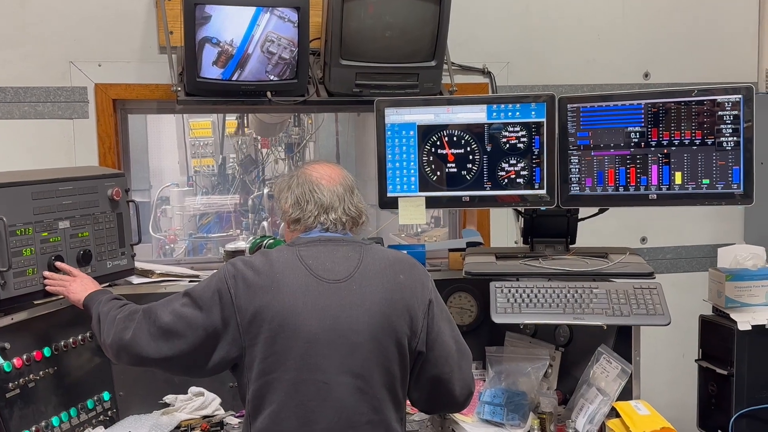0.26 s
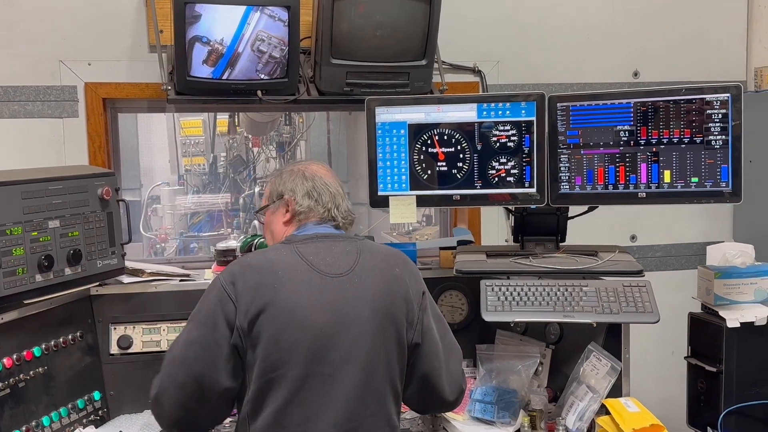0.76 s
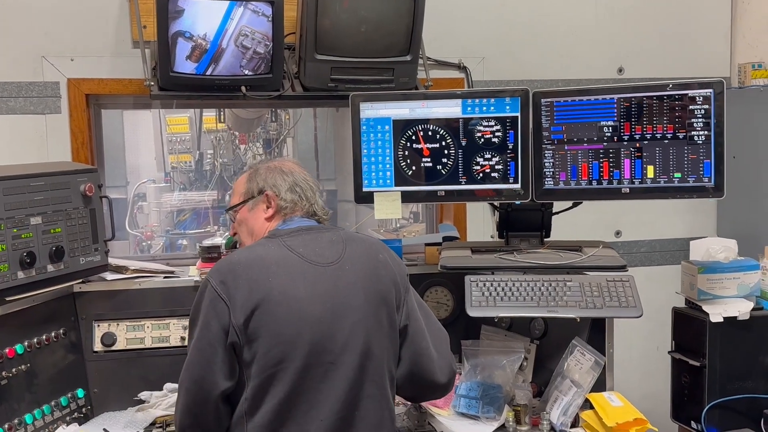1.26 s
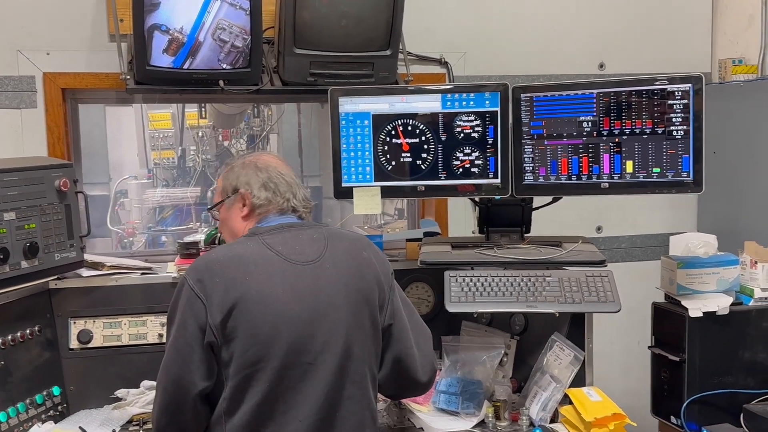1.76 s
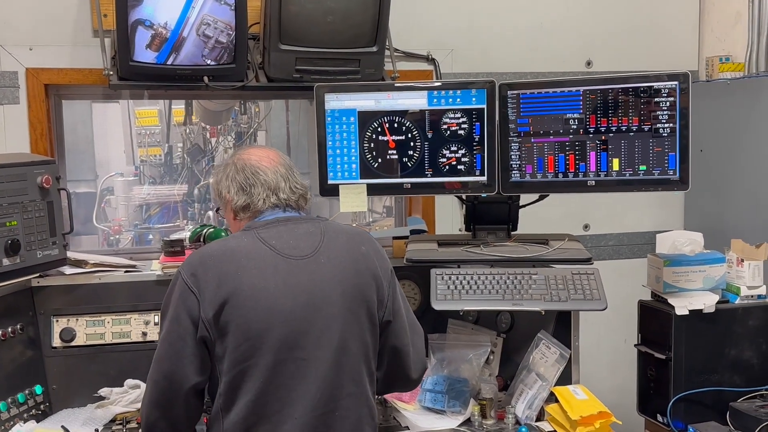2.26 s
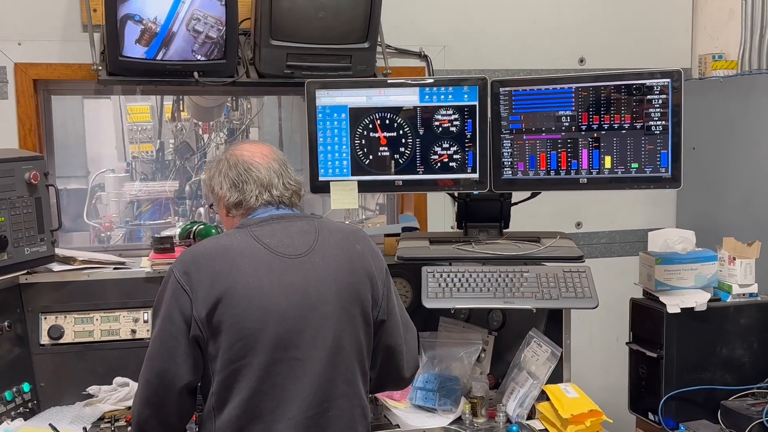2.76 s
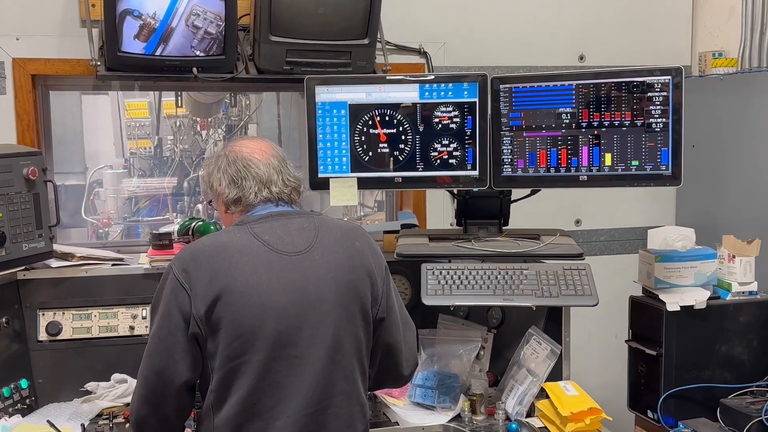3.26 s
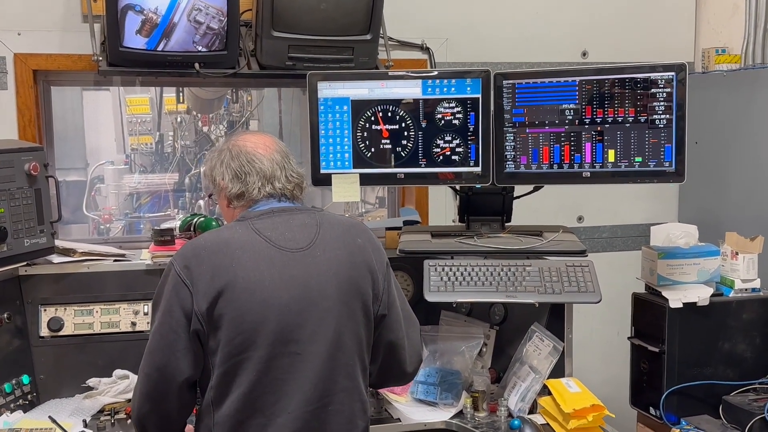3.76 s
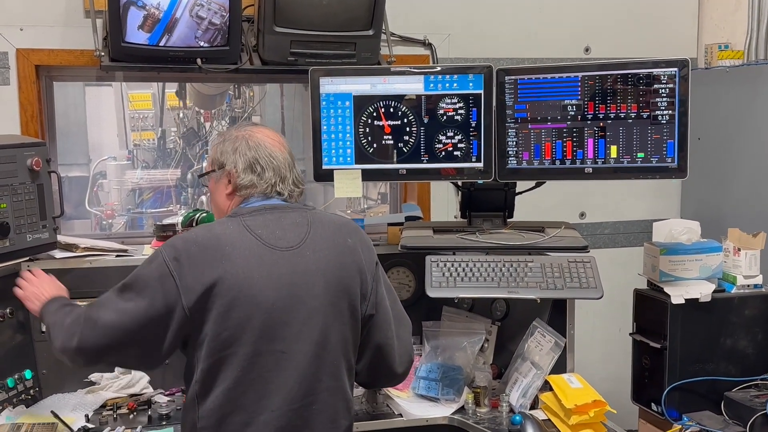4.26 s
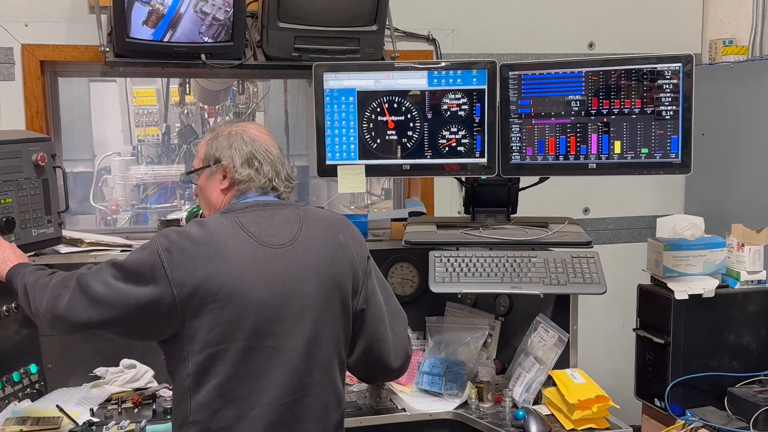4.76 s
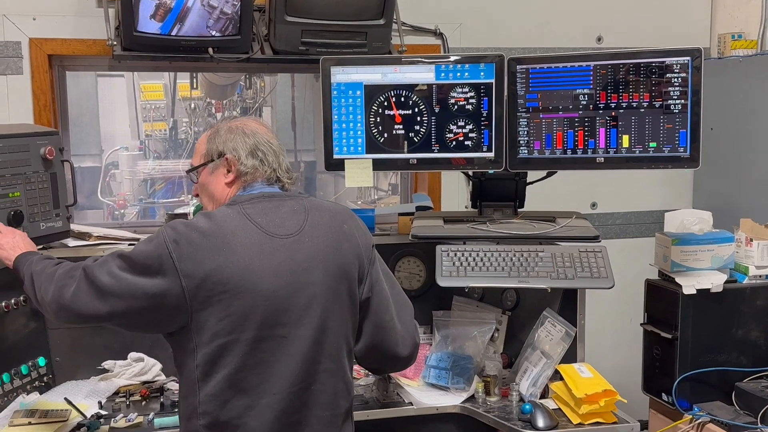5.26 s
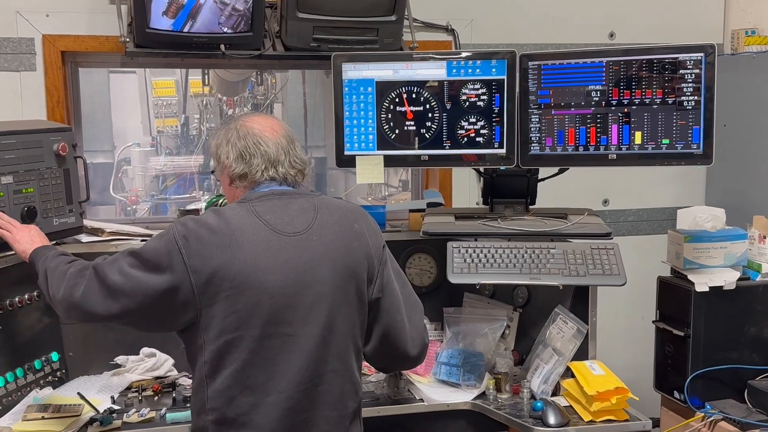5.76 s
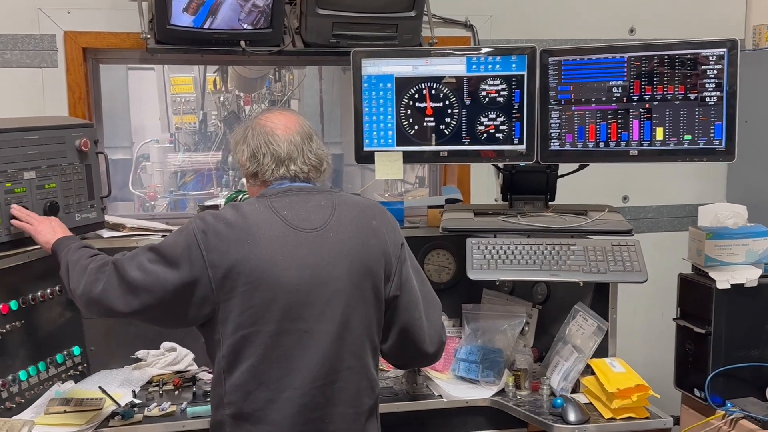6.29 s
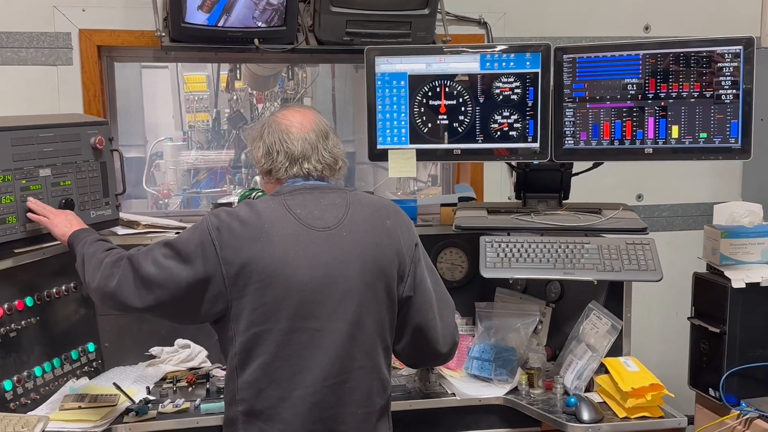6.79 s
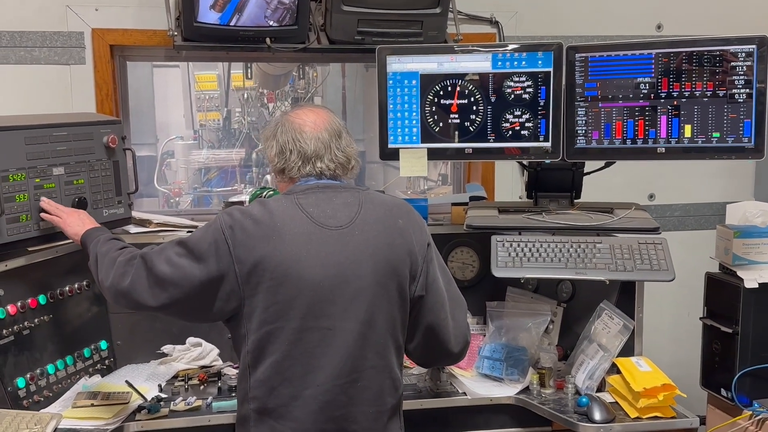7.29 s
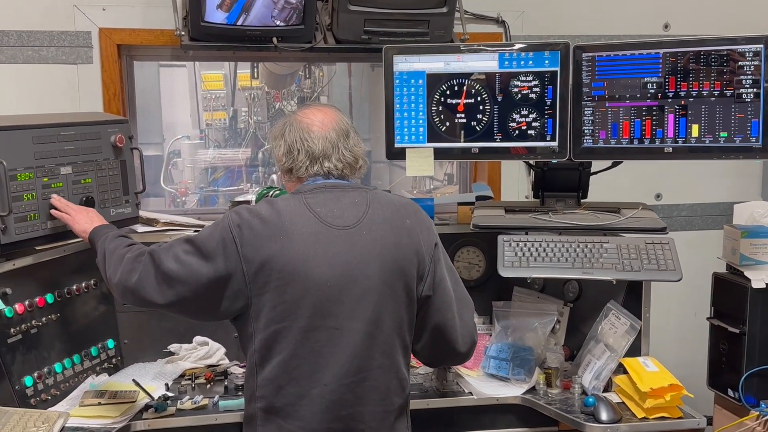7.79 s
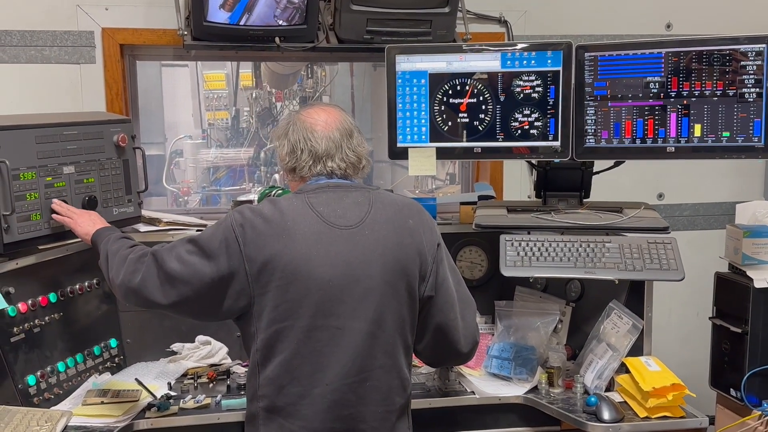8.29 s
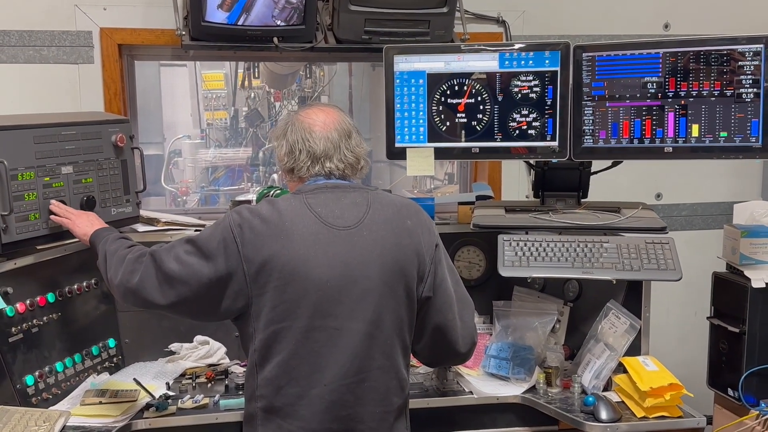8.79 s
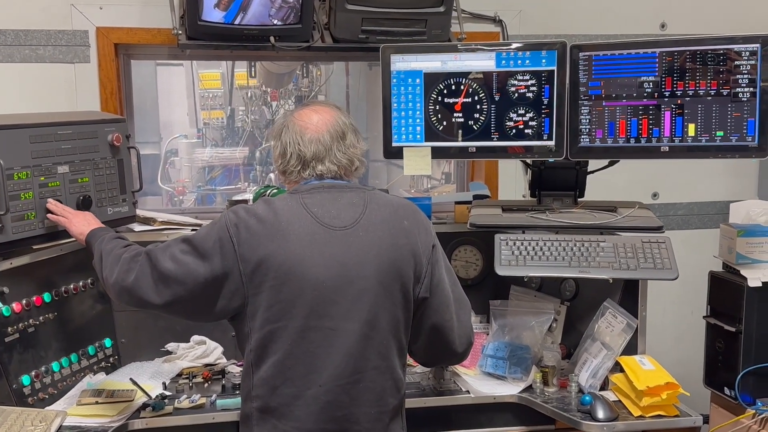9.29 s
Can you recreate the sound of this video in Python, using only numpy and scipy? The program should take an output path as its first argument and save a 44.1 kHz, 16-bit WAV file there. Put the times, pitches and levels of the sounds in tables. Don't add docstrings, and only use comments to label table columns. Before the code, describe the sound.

In a control room, a four-cylinder engine runs behind the test-cell window, a muffled low drone wavering slightly under steady ventilation roar and fan hum. A small hard object clinks once near two seconds. After five seconds the throttle opens, the pitch climbs by about a third with swelling tones, clatter and air hiss, then holds high. Stereo pickup from one small device in the room.

```python
import sys
import numpy as np
from scipy import signal
from scipy.fft import rfft, irfft, next_fast_len
from scipy.io import wavfile

SR = 44100
rng = np.random.default_rng(int(sys.argv[2]) if len(sys.argv) > 2 else 0)


def wav_record(signal):
    frames = np.transpose(np.atleast_2d(signal))
    bounded = np.clip(frames, -1, 1)
    quanta = np.round(bounded * 32767).astype(np.int16)
    wavfile.write(sys.argv[1], SR, quanta)


def volts_from_decibels(level):
    exponent = np.asarray(level, float) / 20
    return 10 ** exponent


N = 420707
SIZE = next_fast_len(N)
HZ = np.maximum(np.arange(SIZE // 2 + 1) * SR / SIZE, 1)

# f/Hz, likeness (clipped to 0-1)
LIKENESS = [(90, .999), (140, 1.3), (250, .84), (400, 0.8), (700, 0.32), (1000, .5), (1500, .58),
            (2100, 0.96), (4200, 1), (6000, .985), (8200, 1.5), (9700, 1.3), (11800, 1.2), (14500, 1)]


def rms_one(x):
    return x / np.sqrt(np.mean(x ** 2) + 1e-20)


def along(rows, at):
    first, *columns = np.transpose(rows)
    return [np.interp(at, first, column) for column in columns]


def at_hz(points, hz):
    point_hz, value = np.array(points).T[:2]
    return np.interp(np.log(hz), np.log(point_hz), value)


def drift(rate_hz):
    r = np.exp(-2 * np.pi * rate_hz * 40 / SR)
    white = rng.standard_normal(N // 40 + 2002)
    slow = signal.lfilter([1], [1, -2 * r, r * r], white)[2000:]
    return np.interp(np.arange(N) / 40, np.arange(len(slow)), rms_one(slow - slow.mean()))


def coloured(gain, alike):
    one, other = rfft(rng.standard_normal((2, SIZE))) * np.sqrt(SR / 2) * gain
    alike = np.clip(alike, 0, 1)
    second = alike * one + np.sqrt(1 - alike ** 2) * other
    return irfft([one, second], SIZE)[:, :N]


def ports(x):
    # f/Hz, lead of the left port/rad
    lead = [(0, -0.09), (860, 0.82), (1720, -0.17), (3360, 0.68), (4900, 0.45), (6400, 0.07), (7240, 1.2),
            (7850, 2.7), (8200, 3.05), (8680, 2.8), (9300, 1.33), (11300, -0.1), (13300, 0), (14200, -1.1),
            (15100, -1.7), (15600, -2.2)]
    # f/Hz, left minus right level/dB
    tilt = [(60, .6), (250, 1.1), (860, 1.0), (1550, 2.3), (2200, .4), (6000, .01)]
    half = volts_from_decibels(at_hz(tilt, HZ) / 2) * np.exp(.5j * along(lead, HZ)[0])
    return irfft(rfft(x, SIZE) * [half, 1 / half], SIZE)[:, :N]


def standing_waves(modes, hz):
    coarse = hz[::64]
    total = 0
    for centre_hz, half_width_hz, level_db, polarity in modes:
        total = total + np.sign(polarity) * volts_from_decibels(level_db) / (1 + 1j * (coarse - centre_hz) / half_width_hz)
    level_db = 20 * np.log10(np.abs(total) + 1e-6)
    return np.interp(np.arange(N) / 64, np.arange(len(coarse)), level_db)


def ventilation():
    # f/Hz, level per Hz/dB
    air_noise = [(22, -77), (33, -68), (41, -66), (50, -51.5), (70, -53.5), (90, -58.5), (140, -57),
                 (250, -59.5), (310, -56), (400, -58), (700, -60.5), (1000, -63.5), (1500, -67), (2100, -72),
                 (2101, -72), (3000, -75.5), (4200, -80.5), (5500, -84), (6500, -84), (8000, -82.5), (9500, -87),
            (10300, -90), (11200, -97.5), (13000, -100.8), (14300, -102), (15600, -98)]
    # f/Hz, width/Hz, level/dB, left-right likeness (0-1)
    hums = [(53, 4.4, -43, .99), (64.5, 4, -44.5, .99), (116, 13, -42.5, .97), (213, 5.3, -41, 0.91),
            (305, 8.7, -41.5, 0.9), (1382, 4, -47.5, 0.76), (5178, 1.5, -66.5, .99), (9399, 4, -76, .9),
            (10675, 3, -75.5, .95), (13238, 4, -77, .99), (14303, 6, -82, .8)]
    power = volts_from_decibels(at_hz(air_noise, HZ)) ** 2
    alike = at_hz(LIKENESS, HZ) * power
    for hz, width, level_db, hum_alike in hums:
        line = volts_from_decibels(level_db) ** 2 * width / np.pi / ((HZ - hz) ** 2 + width ** 2)
        line = line * (np.abs(HZ - hz) < 8 * width)
        power = power + line
        alike = alike + hum_alike * line
    return coloured(np.sqrt(power), alike / power) * volts_from_decibels(.3 * drift(2.7))


def fan_tones(time):
    # f/Hz, level/dB, wobble/dB, lead of the left port/rad
    tones = [
        (108.6, -46, 1.5, .1),
        (117.7, -33, 1.5, .1),
        (128.1, -44, 2.5, .1),
        (322.1, -34.5, 1.2, 0.95),
    ]
    # start t/s, length/s, level/dB
    whistle = [
        (0, 1.0, -68),
        (4.85, .85, -64),
    ]
    whistle_hz, rest_db, fade_db_per_s = 10126, -79, 22.0
    spells = []
    for start, length, level_db in whistle:
        outside = np.maximum(np.abs(time - start - length / 2) - length / 2, 0)
        spells.append(level_db - fade_db_per_s * outside)
    whistle_db = np.maximum(np.max(spells, axis=0), rest_db)
    thin = volts_from_decibels(whistle_db) * np.sin(2 * np.pi * whistle_hz * time + 1.5 * drift(6.0))
    out = thin * np.ones((2, 1))
    for hz, level_db, wobble_db, lead in tones:
        phase = 2 * np.pi * hz * time + 0.42 * drift(1.0)
        out += volts_from_decibels(level_db + wobble_db * drift(1.4)) * np.sin(phase + lead * np.array([[.5], [-.5]]))
    return np.sqrt(2) * out


def clink(time):
    # f/Hz, level/dB, time to fall 60 dB/s
    modes = [
        (5695, 1.5, .03),
        (9350, -7, .03),
        (14300, -.5, .016),
    ]
    clink_s, clink_db = 1.979, -33.5
    out = np.zeros(N)
    touches = round(clink_s * SR) + (np.array([0, .004, .008]) * SR).astype(int)
    for hz, level_db, t60 in modes:
        clicks = np.full(N, 1e-18)
        clicks[touches] = volts_from_decibels(clink_db + level_db - 9.0 * np.arange(3))
        r, w = volts_from_decibels(-60 / (t60 * SR)), 2 * np.pi * hz / SR
        out += signal.lfilter([0, np.sin(w)], [1, -2 * r * np.cos(w), r * r], clicks)
    since, white = time - clink_s, rng.standard_normal(N)
    tail = np.where(since > 0, volts_from_decibels(-60 * since / .16), volts_from_decibels(60 * np.minimum(since, 0) / .007))
    crack = np.where(since > -.004, volts_from_decibels(-60 * since / .07), 0)
    bright_band = signal.butter(4, [14100, 15700], "band", fs=SR, output="sos")
    broad_band = signal.butter(2, [6500, 11000], "band", fs=SR, output="sos")
    bright = rms_one(signal.sosfilt(bright_band, white))
    broad = rms_one(signal.sosfilt(broad_band, white))
    return out + volts_from_decibels(clink_db - 11.5) * tail * bright + volts_from_decibels(clink_db - 13.0) * crack * broad


def intake(throttle):
    shut_db, open_gain_db = -68, 15.0
    band = volts_from_decibels(-7.0 * np.log2(HZ / 6000))
    band = band / np.sqrt(1 + (5600.0 / HZ) ** 6) / np.sqrt(1 + (HZ / 9900.0) ** 6)
    return volts_from_decibels(shut_db + open_gain_db * throttle) * rms_one(coloured(band, at_hz(LIKENESS, HZ)))


def gear(turn, cycle_hz, throttle):
    gear_teeth, idler_teeth, idler_db = 52, 52.7, -1
    shut_db, open_gain_db, db_per_hz = -58.3, 5.5, -.47
    faster = cycle_hz - cycle_hz[0]
    shake = .065 * faster * np.sin(4 * turn)
    mesh = np.sin(2 * gear_teeth * turn + 1.0 * drift(12.0) + shake)
    mesh += volts_from_decibels(idler_db - 2.5 * faster) * np.sin(2 * idler_teeth * turn + 2.0 * drift(15.0))
    level_db = shut_db + open_gain_db * throttle + db_per_hz * faster + 1.5 * drift(6.0)
    return volts_from_decibels(level_db) * np.sqrt(2) * mesh


def clatter(turn, throttle):
    shut_db, open_gain_db = -50, 9.0
    pane_hz, pane_width_hz, pane_db = 1383, 3.5, 19.0
    band = volts_from_decibels(-4.0 * np.log2(HZ / 1000))
    band = band / np.sqrt(1 + (500. / HZ) ** 4) / np.sqrt(1 + (HZ / 3700.0) ** 4)
    band *= 1 + volts_from_decibels(pane_db) / (1 + ((HZ - pane_hz) / pane_width_hz) ** 2)
    pulse = 1 + .45 * np.cos(turn) + .55 * np.cos(2 * turn) + 0.37 * np.cos(4 * turn)
    noise = rms_one(pulse * coloured(band, at_hz(LIKENESS, HZ)))
    return volts_from_decibels(shut_db + open_gain_db * throttle) * noise


def weak_levels():
    # multiple of the cycle, level/dB holding, halfway up the climb, at top speed
    standouts = [(1, -58, -47, -48), (2, -55, -45, -36.5), (3, -56, -55, -44), (5, -49, -56, -57),
                 (7, -60, -48, -49), (9, -51, -50, -52), (11, -46.5, -49, -42), (13, -62, -49, -63),
                 (14, -42, -49, -56), (15, -47, -51, -50), (17, -47, -58, -64), (18, -48.5, -60, -56),
                 (20, -56, -45.5, -54), (22, -62, -57, -50), (24, -54.5, -45.5, -53), (26, -62, -55, -44),
                 (28, -51.5, -46, -50), (30, -53, -45.5, -57), (32, -55, -52, -49), (35, -49, -58, -52.5),
                 (36, -49.5, -54, -53)]
    rest_db, knee_order, db_per_order, spread_db = -56, 33.0, -.7, 3.0
    orders = np.arange(1, 49)
    usual_db = rest_db + db_per_order * np.maximum(orders - knee_order, 0)
    levels = usual_db[:, None] + spread_db * rng.standard_normal((len(orders), 3))
    for order, *levels_db in standouts:
        levels[round(order) - 1] = levels_db
    return [(k, *row) for k, row in zip(orders, levels) if k % 4 or k > 16]


def weak_partials(cycle_hz, turn, ripple_db, ripple_hz, flutter_db):
    # f/Hz, width/Hz, lift/dB
    panels = [
        (98, 9.2, 3.0),
        (900, 40, 4.0),
        (1130, 60, 3.5),
        (1375.4, 34, 9.5),
    ]
    speed, coarse = cycle_hz[::64], turn[::4]
    out = np.zeros((2, len(coarse)))
    climb = np.clip((speed - speed[0]) / (speed[-1] - speed[0]), 0, 1)
    moving = 4 * climb * (1 - climb)
    ripple = rng.standard_normal((3, 500))
    for order, held_db, climb_db, top_db in weak_levels():
        hz = order * speed
        shared, left, right = [np.interp(hz / ripple_hz, np.arange(500), r) for r in ripple]
        lift_db = sum(db / (1 + ((hz - centre) / width) ** 2) for centre, width, db in panels)
        flutter = np.interp(np.linspace(0, 79, len(hz)), np.arange(80), rng.standard_normal(80))
        level_db = np.interp(climb, [0, .5, 1], [held_db, climb_db, top_db])
        level_db = level_db + moving * (lift_db + ripple_db * shared) + flutter_db * flutter
        apart = np.sqrt(1 - np.clip(at_hz(LIKENESS, hz), 0, 1) ** 2)
        tone = np.exp(1j * (order * coarse + rng.uniform(0, 2 * np.pi)))
        for ear, own in enumerate((left, right)):
            gain = volts_from_decibels(level_db + 1.6 * apart * own) * np.exp(1.2j * apart * own)
            out[ear] += (np.repeat(gain, 16)[:len(coarse)] * tone).imag
    return np.sqrt(2) * signal.resample_poly(out, 4, 1, axis=1)[:, :N]


def firing_levels(cycle_hz, load_db, throttle):
    # f/Hz, half width/Hz, level/dB, polarity (+1 or -1)
    room_low = [(160.2, 1.2, -14.5, 1), (162.9, 0.9, -22.6, -1), (168.4, 4.8, -12.1, 1),
                (176.4, 2.3, -14.5, 1), (177.2, 9.2, -12.9, -1), (180.5, 2.3, -17.4, 1),
                (187.3, 3.3, -13.1, 1), (197.7, 2.2, -18.8, 1), (199.9, 1.8, -23.9, -1),
                (214.2, 0.5, -24.6, -1), (216.1, 2.3, -22.0, 1)]
    room_mid = [(329.7, 1.0, -25.5, 1), (333.6, 15.2, -35.4, 1), (338.0, 1.4, -17.1, -1),
                (354.4, 4.7, -21.6, -1), (366.9, 3.1, -15.9, 1), (373.5, 1.0, -19.6, 1),
                (388.1, 2.7, -16.2, 1), (389.0, 1.6, -16.5, -1), (396.0, 1.4, -29.0, 1),
                (401.3, 2.0, -33.4, 1), (422.9, 1.0, -31.6, 1), (427.0, 1.8, -24.7, 1)]
    room_upper = [(488, 15, -49, 1), (506, 1.8, -39.5, -1), (533.9, 1.8, -29.5, -1), (546.8, 3.4, -36, -1),
                  (555.8, 6.2, -34.5, -1), (568.4, 1.8, -39, -1), (602, 6.7, -35.5, -1),
                  (615.2, 1.8, -32.5, -1), (634, 2, -35, -1), (643.2, 1.5, -30.5, -1)]
    room_high = [(630, 2.4, -38, 1), (644.4, 2.4, -35, 1), (702.9, 2.4, -39, 1), (720.3, 4.6, -40.5, 1),
                 (801.2, 2.4, -45, 1), (820.8, 2.4, -38, 1), (843, 8, -43, -1)]
    rooms = zip((4, 8, 12, 16), (room_low, room_mid, room_upper, room_high))
    levels_db = [load_db + standing_waves(modes, order * cycle_hz) for order, modes in rooms]
    levels_db[1] += -8.0 * np.clip(1 - throttle / .4, 0, 1)
    levels_db[2:] = [db + 2.2 * drift(4.0) for db in levels_db[2:]]
    return levels_db


def firing_tones(cycle_hz, turn, levels_db):
    # f/Hz, difference/dB, its lead/rad
    firing_side = [(158, -30.5, 1.5), (161, -32, .9), (167, -32, .8), (178, -37, 1.5), (182, -32, -.9),
                   (187, -29, -2.2), (193, -37, -2.5), (202, -45, -4.9), (209, -40, -6.2),
                   (214, -36.5, -6.1)]
    second_side = [(315, -49, 1.2), (334, -39, 1.2), (358, -40, -.2), (365, -25, .6), (374, -30, 1.6),
                   (386, -37, .6), (392, -40, 1.02), (418, -48, -1.2), (428, -41, 1.2)]
    out = np.zeros((2, N))
    for order, level_db in zip((4, 8, 12, 16), levels_db):
        mid = volts_from_decibels(level_db) * np.sin(order * turn)
        if order > 8:
            side = volts_from_decibels(level_db - 8.5) * np.sin(order * turn + 1.1 * drift(1.0))
        else:
            side_db, lead = along(firing_side if order == 4 else second_side, order * cycle_hz)
            side = volts_from_decibels(side_db) * np.sin(order * turn + lead)
        out += np.sqrt(2) * np.array([mid + side, mid - side])
    return out


def scene():
    # t/s, four-stroke cycles per second/Hz
    speed = [(0.0, 39.25), (5.3, 39.3), (5.45, 39.7), (5.6, 40.3), (5.75, 41.1), (5.95, 42.3), (6.15, 44.1),
             (6.35, 45.15), (6.88, 47.14), (7.4, 49.9), (7.78, 51.03), (8.0, 52.25), (8.23, 53.3),
             (8.45, 53.94), (8.6, 53.8), (8.83, 53.55), (9.54, 53.36)]
    # t/s, level/dB
    load = [(0.0, -3.4), (0.4, -4.0), (0.81, -0.1), (1.04, -1.8), (1.61, -1.0), (1.83, -5.8), (2.25, -0.3),
            (2.54, -3.2), (3.08, -0.3), (3.68, 1.2), (4.47, -0.2), (4.6, 2.0), (4.83, -1.7), (5.21, 0.0),
            (8.3, -0.1), (8.54, -15.2), (8.79, -2.6), (9.0, 0.4)]
    # t/s, share (0-1)
    opening = [
        (0, 0),
        (2.4, 0),
        (5.4, .15),
        (6.2, .95),
        (7.4, .95),
        (8.1, .55),
        (9.54, .6),
    ]
    time = np.arange(N) / SR
    cycle_hz, = along(speed, time)
    load_db, = along(load, time)
    throttle, = along(opening, time)
    turn = 2 * np.pi * np.cumsum(cycle_hz) / SR
    diffuse = ventilation() + fan_tones(time) + intake(throttle)
    diffuse += gear(turn, cycle_hz, throttle)
    diffuse += clatter(turn, throttle)
    diffuse += weak_partials(cycle_hz, turn, ripple_db=3.0, ripple_hz=9.0, flutter_db=2.3)
    firing = firing_tones(cycle_hz, turn, firing_levels(cycle_hz, load_db, throttle))
    return ports(diffuse) + clink(time) + firing


def roll_off(x):
    return signal.sosfilt(signal.butter(12, 15700, fs=SR, output="sos"), x)


def record(dry):
    return roll_off(dry)


dry = scene()
out = record(dry)
wav_record(out)
```